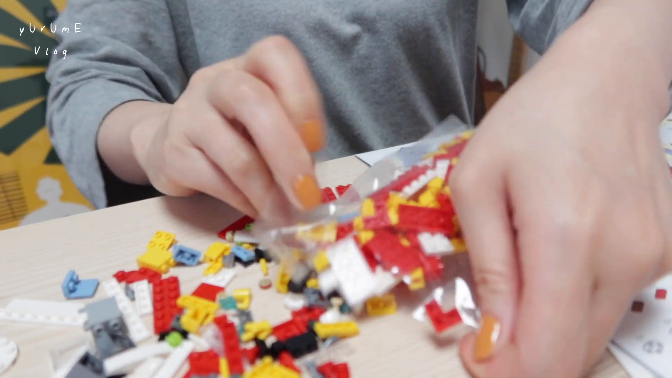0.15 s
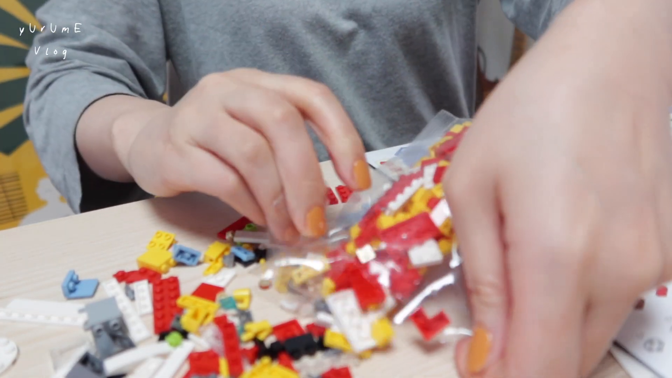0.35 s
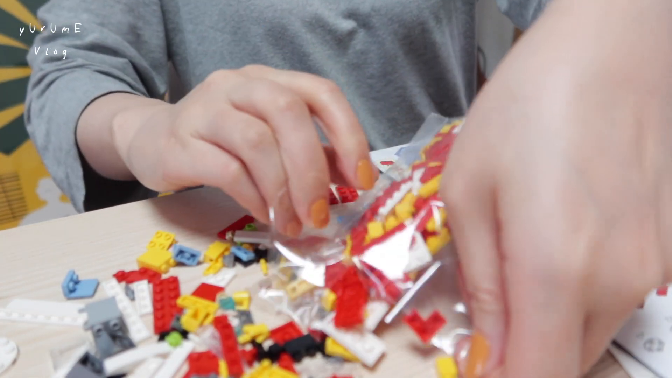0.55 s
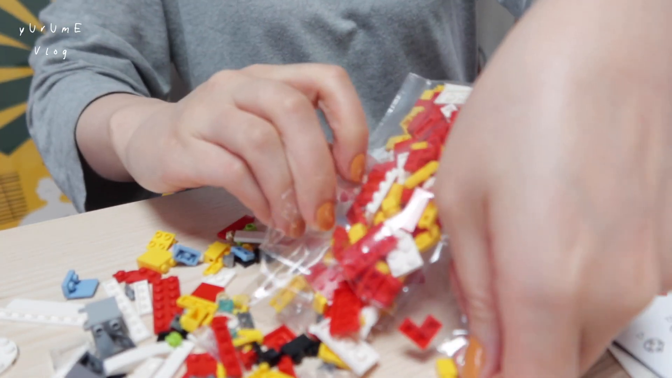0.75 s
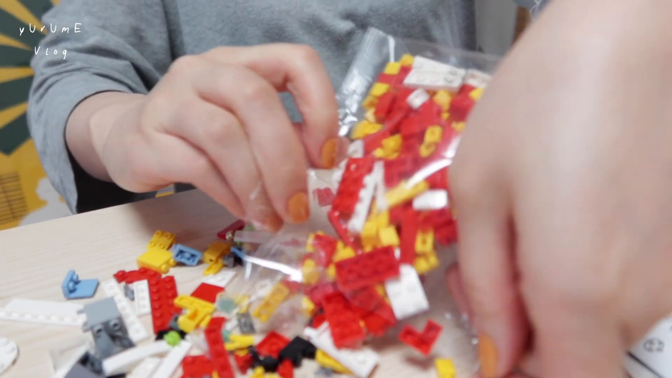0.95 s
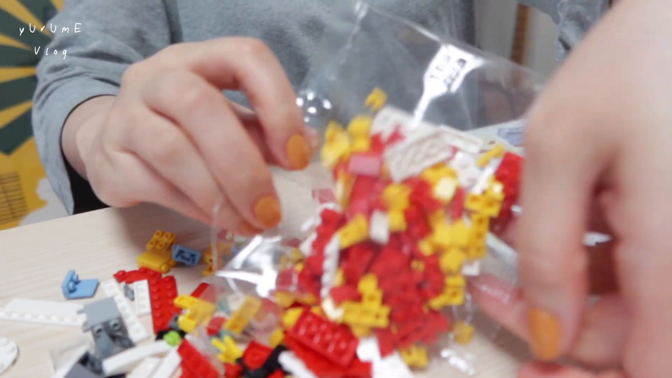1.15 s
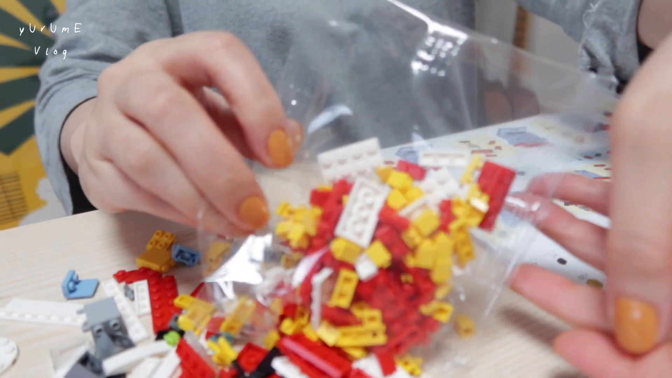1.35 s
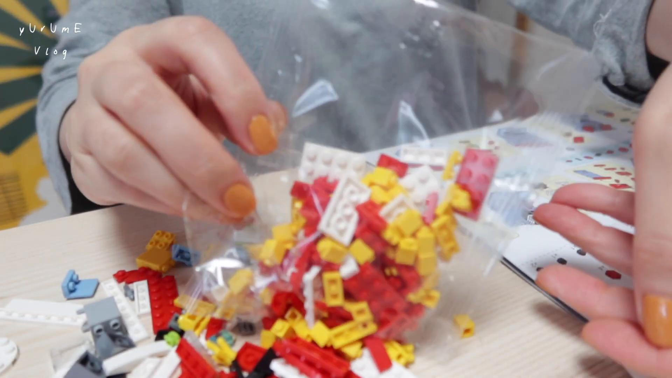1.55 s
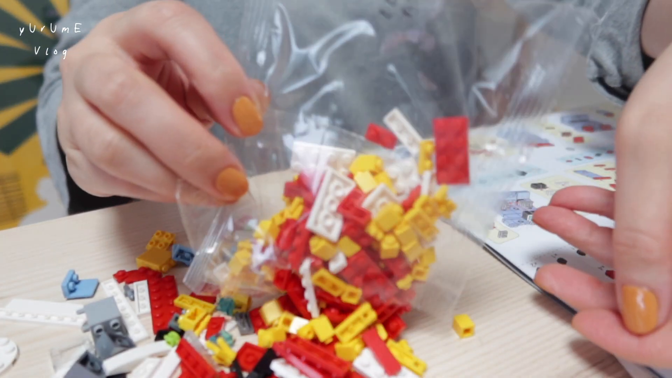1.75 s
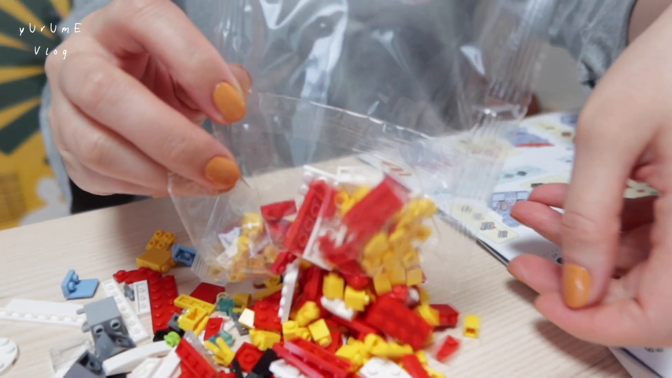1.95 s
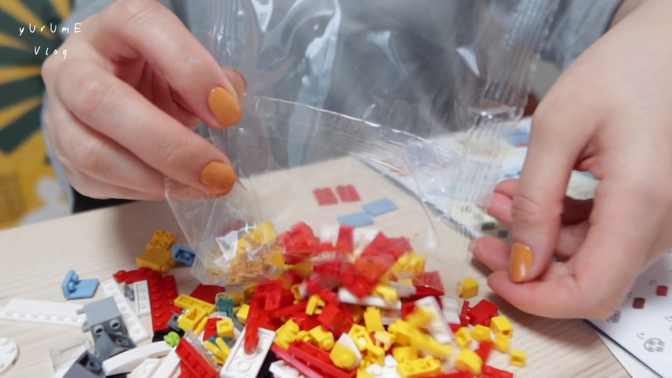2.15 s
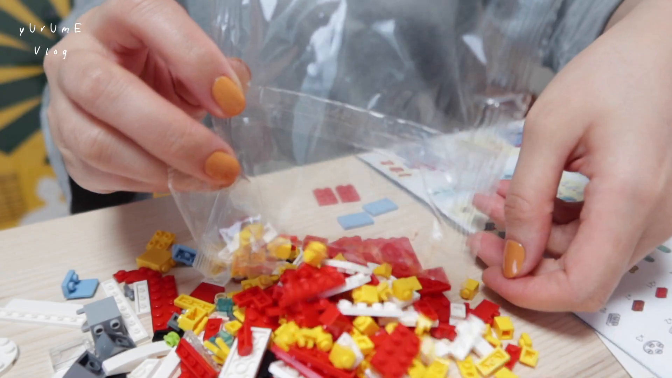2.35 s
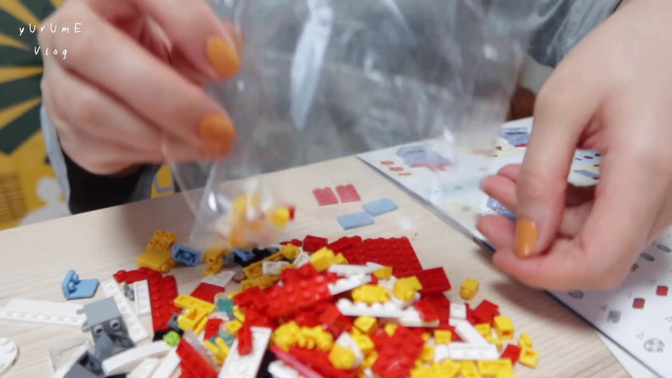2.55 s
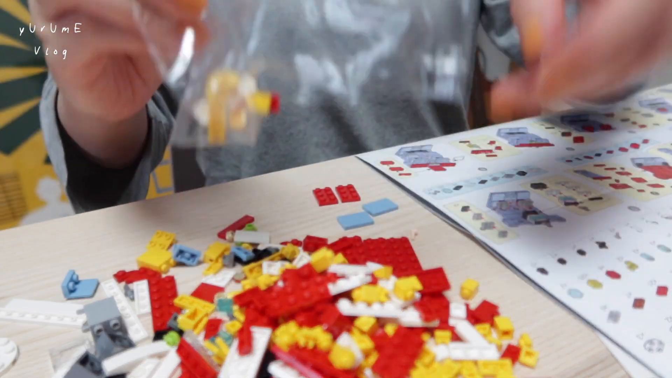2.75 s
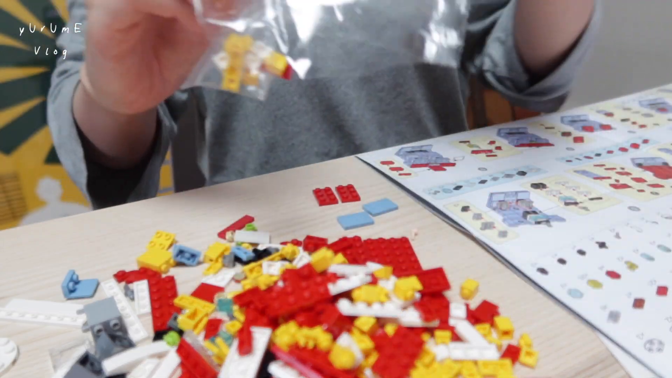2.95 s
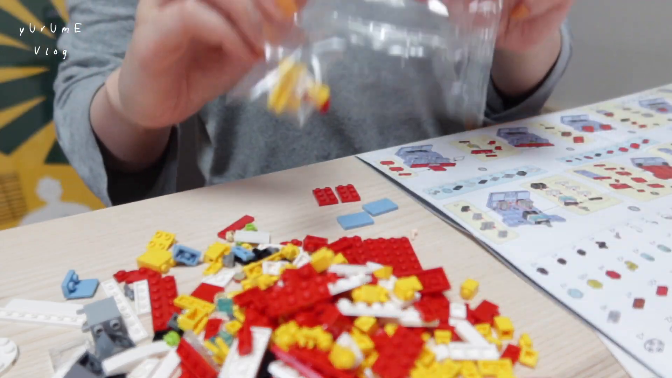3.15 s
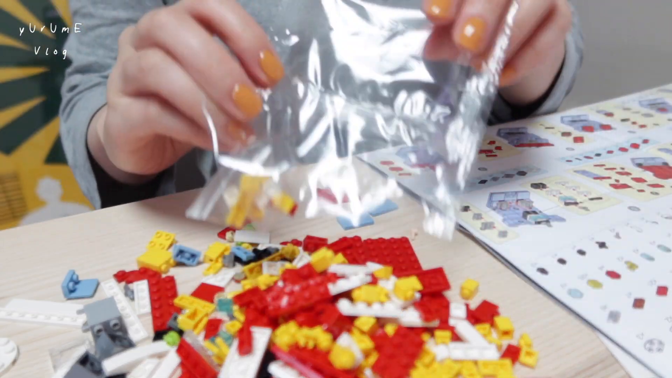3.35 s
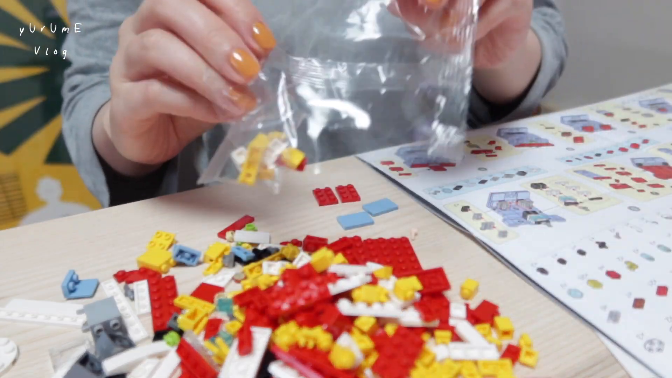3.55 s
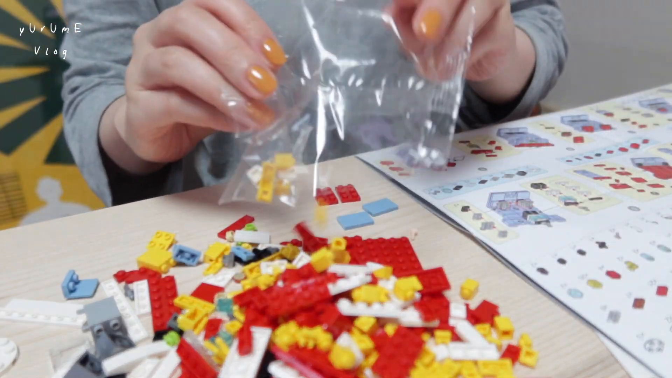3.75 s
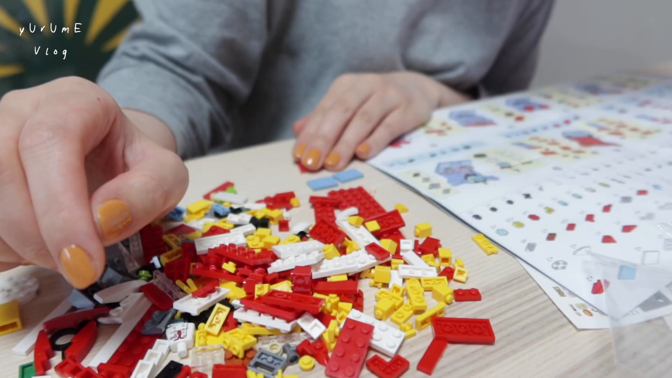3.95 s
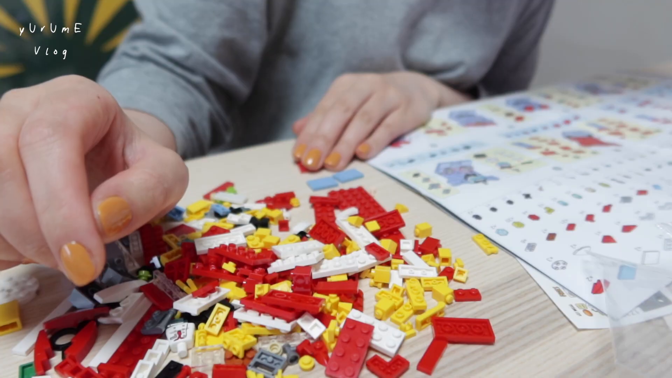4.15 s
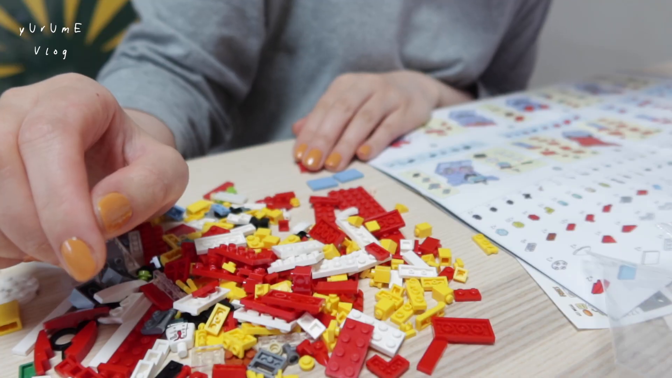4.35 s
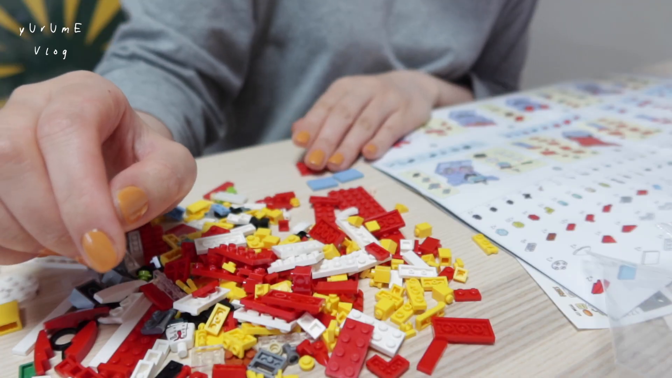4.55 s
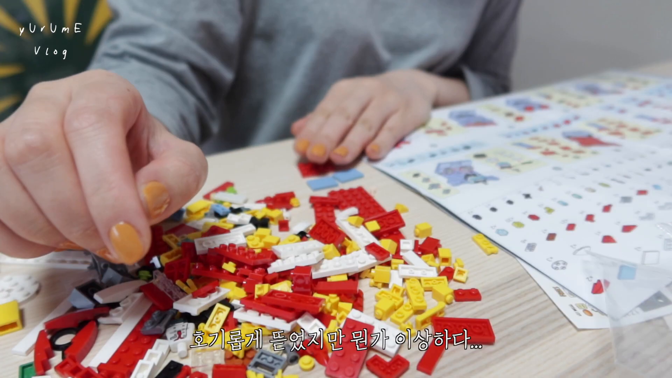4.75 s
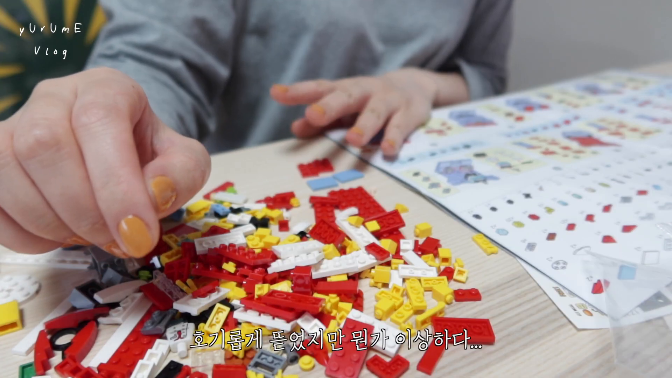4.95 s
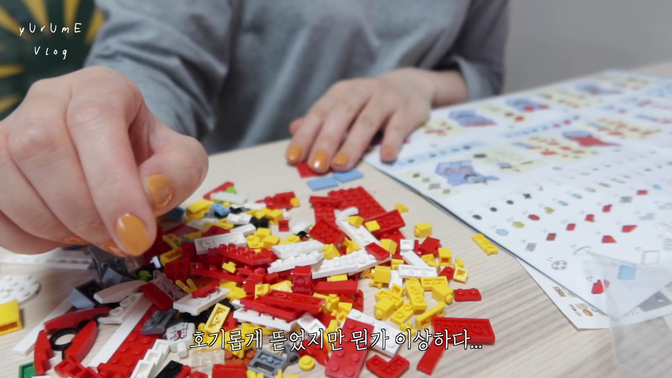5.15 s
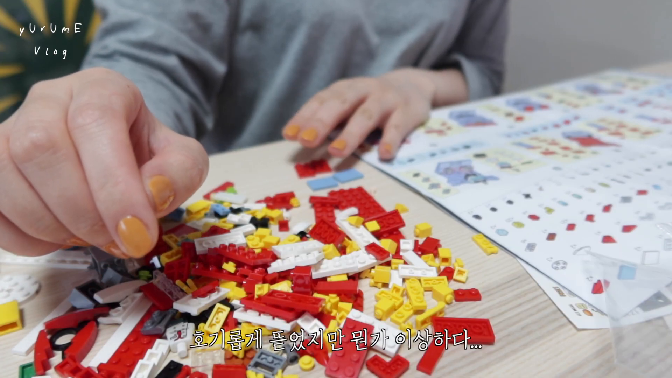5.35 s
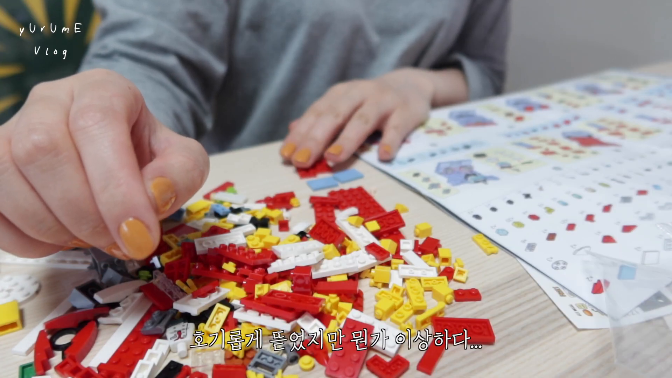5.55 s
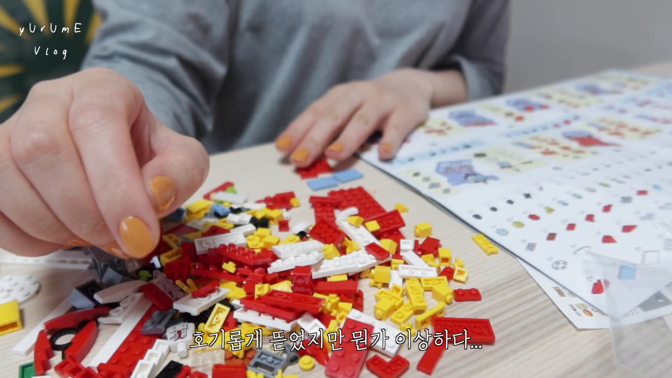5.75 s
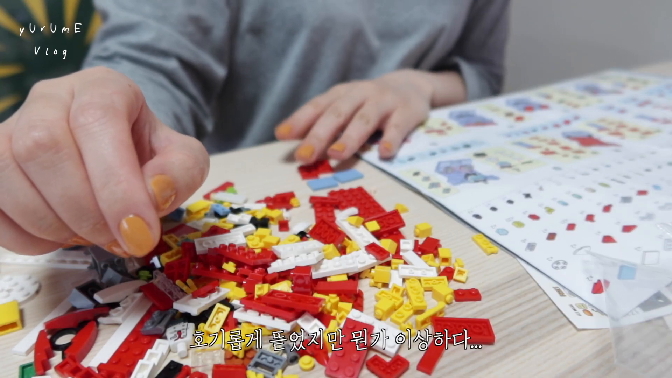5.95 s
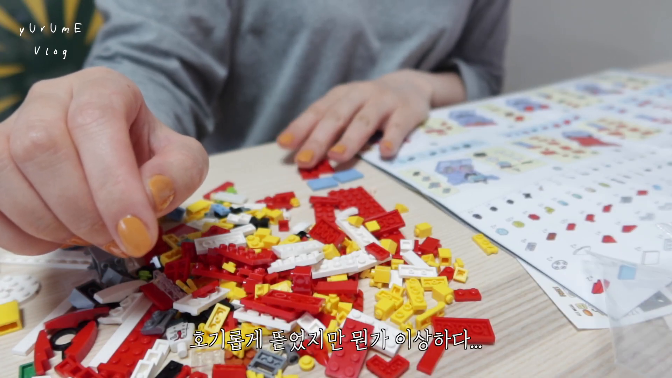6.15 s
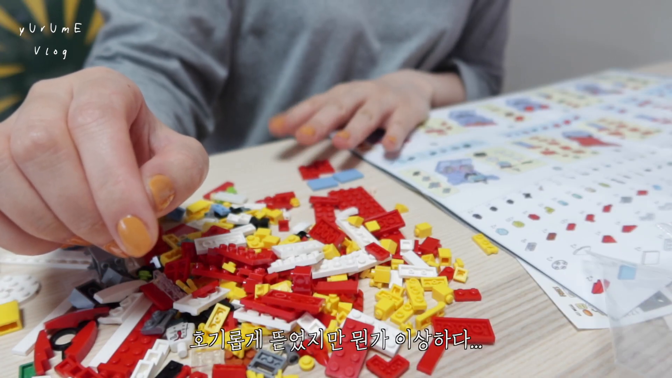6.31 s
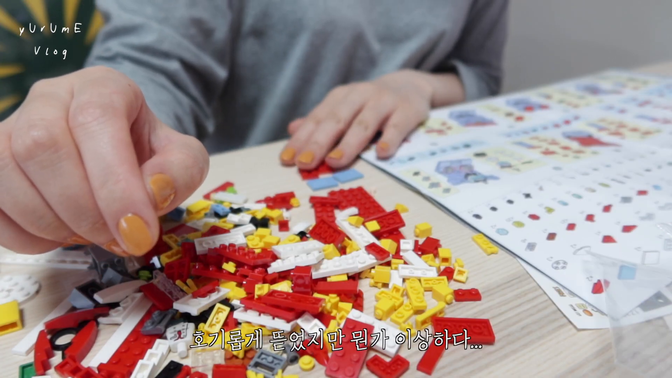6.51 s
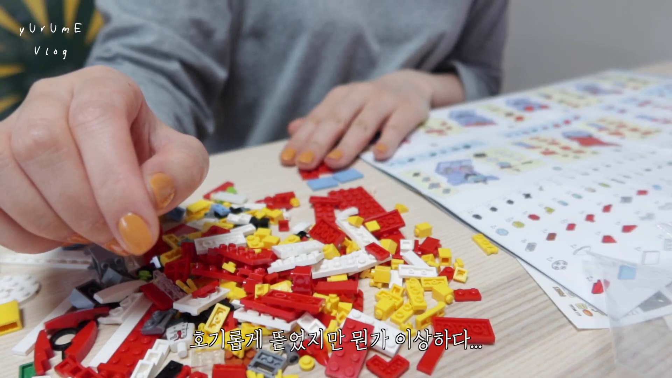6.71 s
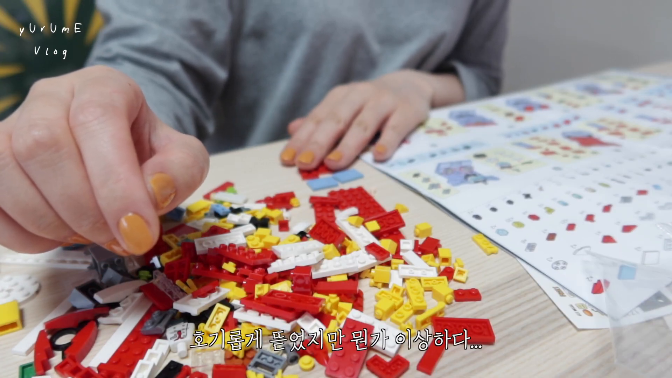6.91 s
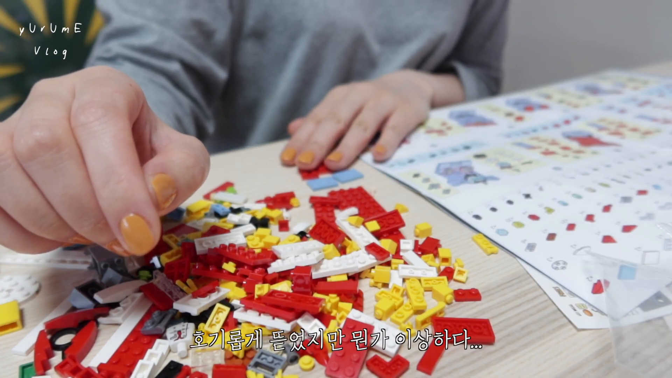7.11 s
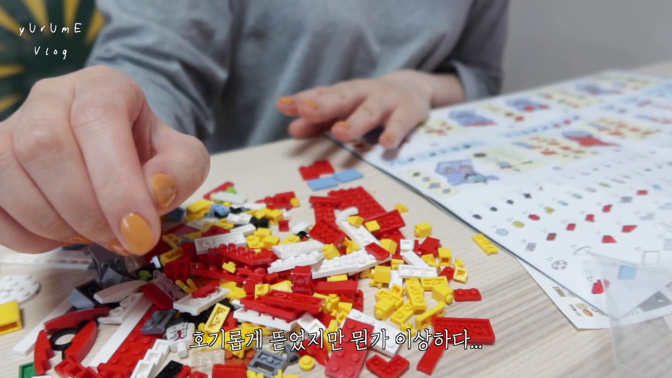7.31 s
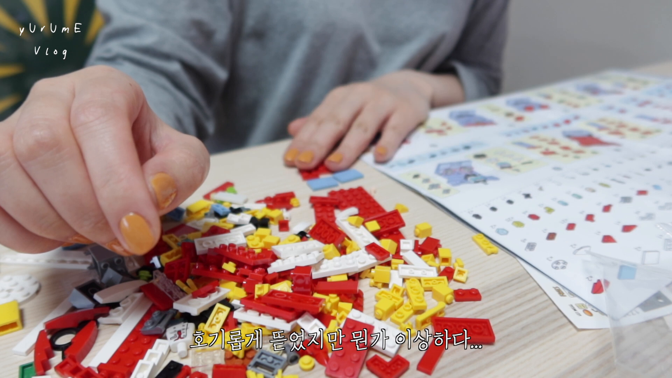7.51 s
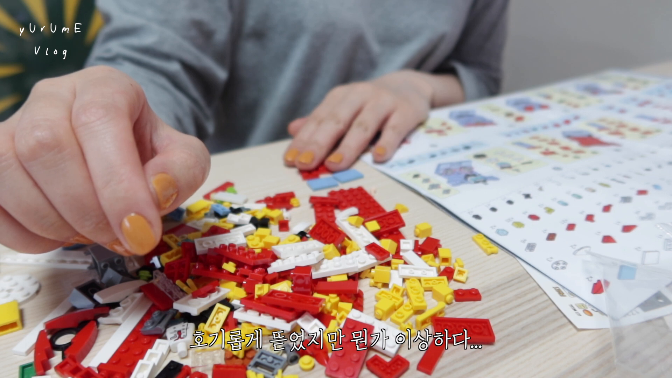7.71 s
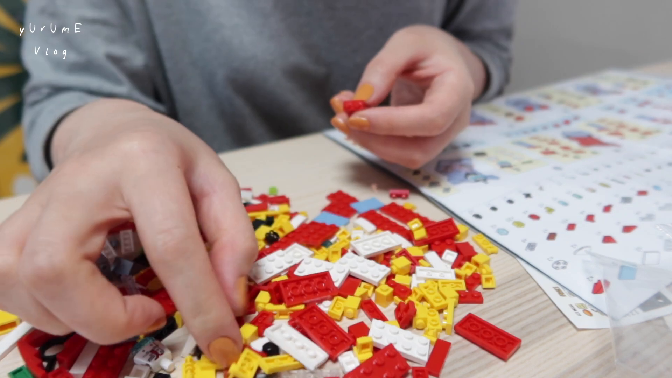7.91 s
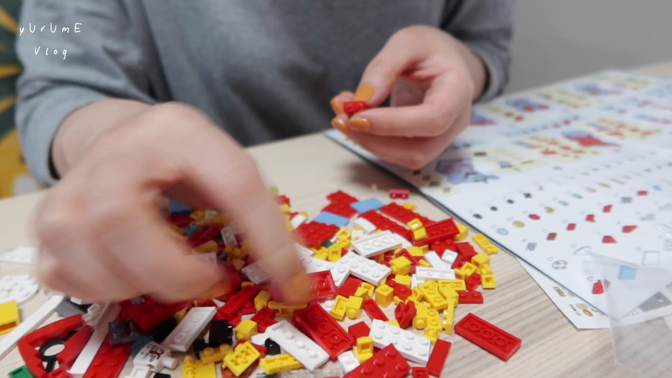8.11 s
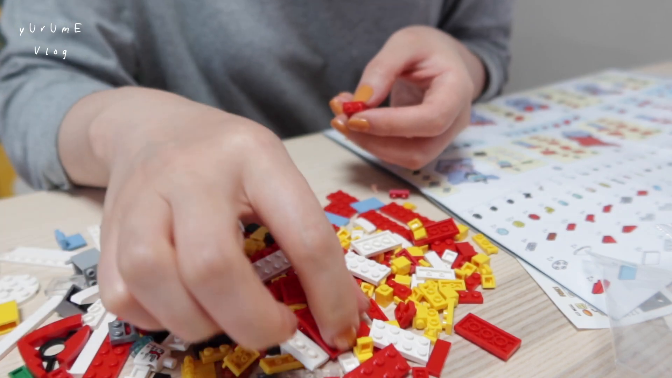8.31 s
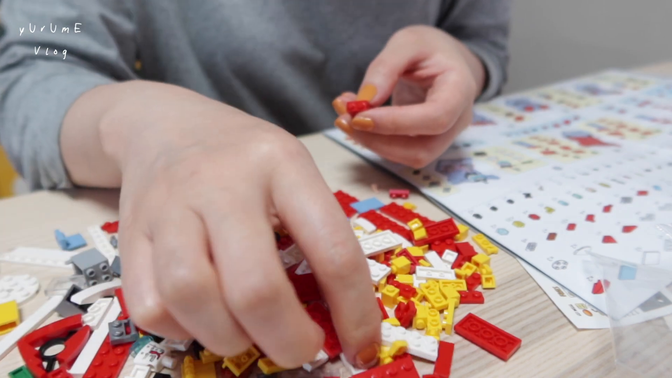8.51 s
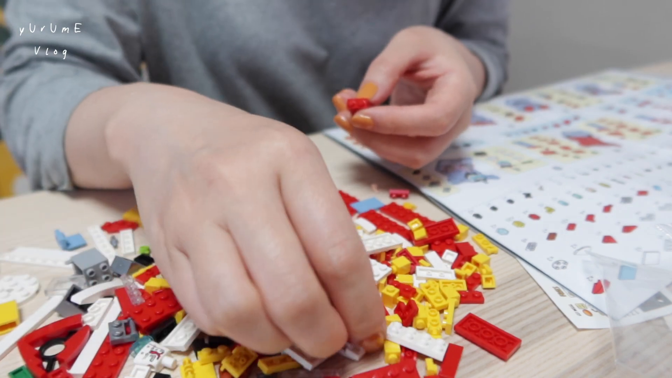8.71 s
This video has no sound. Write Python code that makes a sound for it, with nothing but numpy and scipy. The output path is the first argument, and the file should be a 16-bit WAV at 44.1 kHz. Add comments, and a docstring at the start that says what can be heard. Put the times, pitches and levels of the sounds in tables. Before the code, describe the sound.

Crinkling plastic bag and a clattering pour of small hard bricks, sharp film snaps, abrupt near-quiet with faint taps, then soft brick rummaging.

```python
"""In a small, quiet room small plastic bricks slide out of a crackling film bag onto a wooden table. The
emptied bag snaps, and at 3.987 s the room's tail stops short; then fingers tap, brush and shift a few bricks. A
faint whistle passes, a thin tile rings, and last the fingers rake through the heap. Contacts are damped cycles,
noise bursts and struck modes, sent through a decaying room. A band of noise near 1.1 kHz hums under everything,
over the microphone's hiss."""
import sys
import numpy as np
from scipy import signal
from scipy.fft import rfft, irfft, next_fast_len
from scipy.io import wavfile
from scipy.ndimage import map_coordinates

SR = 44100
rng = np.random.default_rng(int(sys.argv[2]) if len(sys.argv) > 2 else 0)


def store_pcm(level_fs):
    """Save levels as 16-bit WAV."""
    pcm = np.round(np.clip(level_fs, -1, 1) * 32767).astype(np.int16)
    wavfile.write(sys.argv[1], SR, np.atleast_2d(pcm).T)


N = 391166

# single snaps of film and bricks, before the trims of each layer:
# [t/s, level/dB, f/Hz, crack re snap/dB, knock re snap/dB, t60/s]
SNAPS = [(0.0387, -16, 4170, -28, -15.5, 0.0077), (0.0636, -18.5, 3580, -24, -25, 0.007),
         (0.0738, -18.5, 5700, -17, -17, 0.007), (0.121, -15.5, 2950, -24, -24, 0.0066),
         (0.1312, -22, 2420, -18, -16, 0.0076), (0.1955, -17, 1630, -9, -7.5, 0.0063),
         (0.221, -15, 5740, -12, -17, 0.0063), (0.2396, -16.5, 4480, -4, -24, 0.0066),
         (0.2542, -20, 3360, 5.5, -26, 0.0066), (0.352, -26, 3380, -7, -22, 0.007),
         (0.3697, -12.5, 3950, -13, -27, 0.014), (0.416, -26, 5290, -1, -18, 0.0063),
         (0.4476, -32, 3180, 7, -19, 0.0082), (0.4738, -11.5, 4100, -21, -12.5, 0.0072),
         (0.518, -21, 3210, -9, -20, 0.0062), (0.5954, -32, 3060, -4, -13, 0.007),
         (0.6261, -12, 1900, -15, -22.5, 0.0074), (0.6726, -16.5, 2590, -20, -28, 0.0072),
         (0.6962, -11.5, 4450, -20, -36, 0.0063), (0.7056, -19, 3200, -20, -16.5, 0.0082),
         (0.7214, -9.5, 3600, -19, -29, 0.0074), (0.7224, -7.5, 1530, -33, -42, 0.0063),
         (0.749, -19, 1910, -29, -27, 0.0064), (0.8096, -7.5, 2380, -26.5, -29, 0.01),
         (0.8157, -19, 1500, -12.5, -15.5, 0.007), (0.8255, -22, 1600, -14, -15, 0.0077),
         (0.83, -2.5, 3460, -15, -32, 0.0084), (0.9296, -31, 4690, -14, 3, 0.0064),
         (0.985, -13.5, 1400, -20.5, -6.5, 0.0043), (1.0003, -13, 1500, -12.5, -21, 0.007),
         (1.015, -10.5, 2660, -27, -23.5, 0.007), (1.0424, -13, 3670, -20, -14, 0.0079),
         (1.0795, -14, 4800, -16, -22, 0.007), (1.0967, -8, 1760, -8, -9, 0.0064),
         (1.179, 2, 3260, -24, -36, 0.016), (1.3204, -10, 2710, -32, -26, 0.0076),
         (1.355, -25, 1510, -11.5, -23, 0.007), (1.424, -32, 2350, -3, -18, 0.007),
         (1.452, -27, 1900, -8, -11, 0.007), (1.5357, -12, 1600, -23, -19, 0.0065),
         (1.5775, -16, 2020, -30, -21, 0.0085), (1.6232, -19, 3280, -12, -16, 0.0077),
         (1.693, -21.5, 4720, -11, -13, 0.0075), (1.7254, -16.5, 3240, -3, -15.5, 0.0086),
         (1.834, -11.5, 2190, -19, -20, 0.0064), (1.865, -7.5, 2860, -21, -17.5, 0.0046),
         (1.9224, -7, 5120, -8, -24, 0.0067), (1.9812, -8, 5240, -8, -28, 0.0058),
         (2.07, -8, 4870, -19, -14.5, 0.0061), (2.1144, -16, 4960, 1, -29, 0.007),
         (2.1234, -7, 4920, -11, -32, 0.0076), (2.1564, -22, 4680, 5.5, -11, 0.0076),
         (2.2, -10.5, 4720, -4, -32, 0.0093), (2.288, -4.5, 4700, -13, -24, 0.007),
         (2.4207, -9.5, 4600, -18, -30, 0.0061), (2.4853, -22, 4040, -7, -16, 0.007),
         (2.5134, -27, 3210, -17, -35, 0.0063), (2.8363, -9, 4380, -13.5, -59, 0.011),
         (2.9404, -24, 3600, -30, -24, 0.0075), (2.9601, -24, 2720, -23, -20, 0.0091),
         (2.9773, -25, 2270, -22, -28, 0.0075), (3.0952, -33, 4570, -16, -16, 0.007),
         (3.1581, -14, 2980, -35, -13, 0.0086), (3.1691, -17, 2900, -41, -6, 0.01),
         (3.2213, -15.5, 3080, -32, -30, 0.0094), (3.258, -16.5, 3600, -17, -11.5, 0.0083),
         (3.279, -30, 1500, -30, -5, 0.007), (3.2945, -15, 3200, -37, -12, 0.0071),
         (3.3903, -31.5, 1580, -29, 6, 0.0058), (3.4163, -27, 1760, -26, -10, 0.0064),
         (3.4615, -0.5, 3600, -11.5, -30, 0.0069), (3.471, -20, 2320, -18, -22, 0.007),
         (3.5214, -23, 3800, -31, -6, 0.0047), (3.5368, -7, 3030, -28, -13.5, 0.0066),
         (3.6456, -40, 3290, -21, -11, 0.007), (3.6583, -28, 1560, -19, -5, 0.0053),
         (3.6698, -6, 3070, -16.5, -18.5, 0.011), (3.6843, -25.5, 1570, -17, 1, 0.0057),
         (3.7053, -21, 1540, -12, -19, 0.007), (3.7307, -23.5, 1990, -19, -9, 0.007),
         (3.7588, -19.5, 3570, -21, -14, 0.007), (3.7912, -8, 5810, -11, -28, 0.0081),
         (3.8024, -4.5, 5330, -12, -34, 0.011), (3.805, -14, 5700, -10, -30, 0.012),
         (3.8246, -20, 3630, -23, -24, 0.007), (3.8424, -13, 3740, -10, -25, 0.0076),
         (3.8478, -3, 4100, -7, -21, 0.0086), (3.8589, -14, 4940, -8, -14, 0.012),
         (3.866, -7.5, 3240, -19, -17, 0.012), (3.8697, -5.5, 2710, -15, -19, 0.011),
         (3.8896, 1, 3370, -12, -20, 0.005), (3.8913, -5.5, 3640, -23, -18, 0.008),
         (3.8978, -15, 2200, -20, -22, 0.007), (3.9003, -5, 4700, -19, -35, 0.011),
         (3.9105, -8, 3070, -27, -28, 0.0064), (3.929, -9, 3950, -14, -21, 0.0053),
         (3.9467, -2.5, 3280, -13, -14.5, 0.0073), (5.3233, -21, 3260, -16, -33, 0.0081),
         (6.4238, -34.5, 2400, -18, -12, 0.0072), (7.553, -30.5, 2330, -25, -27, 0.016),
         (7.824, -18.5, 4900, -2, -23, 0.0064), (7.8512, -14, 4960, -1, -21, 0.0075),
         (7.9015, -13, 4250, -13, -39, 0.007), (7.934, -19.5, 4700, -1, -25, 0.0082),
         (7.9615, -22, 1660, -10, -23, 0.007), (7.9856, -19, 4800, -17, -29, 0.009),
         (8.03, -21.5, 4860, -13, -26, 0.0084), (8.1058, -24, 4800, -5.5, -24, 0.0074),
         (8.1424, -27.5, 6300, -21, -27, 0.0063), (8.1514, -26, 6160, -17, -25, 0.0078),
         (8.424, -23, 4700, -9, -11, 0.0061), (8.4718, -19, 4800, -6, -17, 0.0097),
         (8.5051, -23, 4460, -6, -13, 0.0059), (8.5604, -37, 4380, -14, -22, 0.007),
         (8.5805, -31, 4320, -20, -17, 0.0088), (8.6218, -30, 3840, -7, -27, 0.0076),
         (8.6418, -37, 4970, -14, -17, 0.007), (8.667, -30, 4320, -10, -21, 0.0077),
         (8.6812, -24, 4750, -4, -18, 0.007), (8.7156, -28, 4790, -12, -25, 0.0076),
         (8.7425, -28, 5000, -18, -22, 0.007), (8.77, -30, 4300, 3, -22, 0.007),
         (8.792, -24, 6100, -13, -18, 0.0074), (8.807, -26, 1610, -5, -16, 0.0064),
         (8.847, -20.5, 2720, -11, -24, 0.0079)]
# shell modes of a plastic brick: [f/Hz, width/Hz, relative level/dB]
BRICK_MODES = [(565, 37, -15.5), (1623, 60, -11), (3280, 600, -16.5), (4775, 86, -4), (5600, 890, -16),
               (10450, 136, -4), (11300, 98, -10), (12200, 3100, -19.5)]
SIZE_SCATTER = 0.019  # largest relative shift of the modes from brick to brick
SNAP_LAG_S, SNAP_RISE_S = 0.000985, 0.0005  # short silent delay before each piece sounds; then its rise


def amp(db):
    """Decibels to gain."""
    return 10 ** (np.asarray(db) / 20)


def unit(x):
    """Scaled to rms 1."""
    return x / np.sqrt(np.mean(x ** 2) + 1e-20)


def along(points, hz):
    """Values between (Hz, value) points on a log frequency axis."""
    f, v = np.transpose(points)
    return np.interp(np.log(hz + 1), np.log(f + 1), v)


def filtered(x, response):
    """x times a complex response of frequency."""
    m = next_fast_len(N + SR // 2)
    return irfft(rfft(x, m) * response(np.fft.rfftfreq(m, 1 / SR)), m)[..., :N]


def causal(spectrum):
    """Minimum-phase response for a (Hz, dB) spectrum, so that nothing sounds before a blow."""
    def response(hz):
        cepstrum = irfft(np.log(amp(along(spectrum, hz)) + 1e-6))
        half = len(cepstrum) // 2
        cepstrum[1:half] *= 2
        cepstrum[half + 1:] = 0
        return np.exp(rfft(cepstrum))
    return response


def high_pass(hz, corner_hz):
    """First-order response that loses the bass below its corner."""
    return 1j * hz / (corner_hz + 1j * hz)


def contacts(per_second, spread_db):
    """Random impulses of either sign, many small and a few large."""
    hit = rng.random(N) < per_second / SR
    size_db = spread_db * np.minimum(rng.exponential(size=N), 4)
    return hit * amp(size_db) * rng.standard_normal(N)


def grains(spectrum, per_second, cycles, spread_db):
    """Random contacts of scattered size, each damped cycles at its own pitch, 60 dB down after `cycles`."""
    rows = rng.random((int(per_second * N / SR), 4))
    low, high = spectrum[0][0], spectrum[-1][0]
    hz = low * (high / low) ** rows[:, 1:2]
    size_db = spread_db * np.minimum(-np.log(rows[:, 2:3]), 4)
    size = amp(along(spectrum, hz) + size_db) * np.sqrt(hz)
    turns = np.arange(int(cycles * SR / low * 2 // 3)) / SR * hz  # cycles since contact
    wave = size * amp(-60 * turns / cycles) * np.sin(2 * np.pi * turns) * np.minimum(turns, 1)
    where = (rows[:, :1] * N).astype(int) + np.arange(turns.shape[1])
    return unit(np.bincount(where.ravel(), wave.ravel())[:N])


def stretches(tables):
    """One gain per level column, silent between the movements, clumpy within them."""
    uneven_db, uneven_per_s = 2.5, 30  # bricks come in clumps
    t, gains = np.arange(N) / SR, 0
    for rows in tables:
        s, *columns = np.transpose(rows)
        gains = gains + amp([np.interp(t, s, c, left=-120, right=-120) for c in columns])
    knots = rng.standard_normal((len(gains), int(N / SR * 60)))
    wander_db = [uneven_db * map_coordinates(k, [t * uneven_per_s]) for k in knots]
    return gains * amp(wander_db)


def background():
    """Steady noise shaped in frequency: the hum near 1.1 kHz and the microphone's hiss."""
    # the quiet room and microphone: [f/Hz, relative density/dB]
    quiet_spectrum = [(15, -41), (25, -8), (85, -6.5), (124, -8), (208, -7.5), (378, -13), (470, -9),
                      (706, -15.5), (1150, -1), (1430, -16), (1600, -19.5), (2600, -19.5), (2820, -21),
                      (14800, -25), (16500, -24.5)]
    noise = filtered(rng.standard_normal(N), lambda hz: amp(along(quiet_spectrum, hz)))
    return amp(-53) * unit(noise)  # rms in dB


def room(x, pieces=30):
    """Each frequency of the room's answer dies at its own speed; the hands move, so the tail changes."""
    # decay of the small room: [f/Hz, t60/s]
    room_decay = [(200, 0.29), (1000, 0.38), (4000, 0.2), (12000, 0.24)]
    cut_s, build_up_s = 3.987, 0.0065
    out, cut = np.zeros(N + SR), round(cut_s * SR)
    edges = np.unique(np.append(np.linspace(0, N, pieces).astype(int), cut))
    for a, b in zip(edges, edges[1:]):
        if a == cut:
            out[cut:] = 0  # the tail breaks off here
        hz, t, cells = signal.stft(rng.standard_normal(SR // 3), SR, nperseg=256)
        fall = amp(-60 * t / along(room_decay, hz)[:, None])
        tail = signal.istft(cells * fall * (1 - np.exp(-t / build_up_s)), SR, nperseg=256)[1]
        wet = signal.fftconvolve(x[a:b], tail / np.linalg.norm(tail))
        out[a:a + len(wet)] += wet
    return out[:N]


def whistle():
    """A faint whistle: resonant narrow noise that fades in and out."""
    # the whistle's band: [f/Hz, width/Hz, level/dB]
    hz, width_hz, db = (3300, 70, -73)
    # when it is heard: [from t/s, to t/s]
    start, end = (4.5, 5.22)
    t = np.arange(N) / SR
    band = signal.lfilter(*signal.iirpeak(hz, hz / width_hz, fs=SR), rng.standard_normal(N))
    fade = np.clip(np.minimum(t - start, end - t) / 0.05, 0, 1)
    return amp(db) * unit(band) * fade


def board():
    """One soft blow on the table top: low modes that swell and decay, their levels varying by blow."""
    # modes of the wooden table top: [f/Hz, relative level/dB, t60/s]
    board_modes = [(55.1, -9, 0.54), (80.7, 1.5, 0.2), (108.3, 8.5, 0.095), (144.9, 2, 0.13),
                   (208, 7, 0.067)]
    t = np.arange(SR // 2) / SR
    ring = 0
    for hz, level, t60 in board_modes:
        fall = amp(level + rng.normal(0, 0.58) - 60 * t / t60)
        ring = ring + fall * np.sin(2 * np.pi * hz * t)
    return ring * (1 - np.exp(-t / 0.023))


def thumps():
    """Soft fingertips set the table top ringing low."""
    # fingers landing on the table top: [t/s, level/dB before the trim]
    landings = [(4.521, -56), (6.164, -40.5), (6.423, -31.5), (7.555, -28), (7.828, -58)]
    out = np.zeros(N + SR)
    for s, db in landings:
        out[round(s * SR):][:SR // 2] += amp(db - 3.5) * board()
    return out[:N]


def shudder(blows):
    """Tumbling bricks and hard snaps set the table top humming low."""
    jolt_db = -11.5  # how hard a snap's knock shakes the table top
    jolts = np.zeros(N)
    for s, db, _, _, knock_db, _ in SNAPS:
        jolts[round(s * SR)] = amp(db + knock_db + jolt_db)
    hum = signal.fftconvolve(blows + jolts, board())[:N]
    return filtered(hum, lambda hz: high_pass(hz, 150) ** 3)


def touches():
    """Each brush is a soft puff of noise around its centre."""
    # fingertips brushing bricks and paper: [t/s, level/dB, centre f/Hz]
    brushes = [(4.456, -44, 2580), (4.51, -50, 3370), (4.52, -54, 650), (4.595, -52, 2200),
               (4.69, -53, 2400), (5.125, -50, 2500), (5.14, -47.5, 2350), (5.215, -52, 2600),
               (5.534, -51, 2600), (5.604, -51, 2300), (5.989, -48, 1600), (6.168, -47.5, 2540),
               (6.424, -49.5, 2420), (7.251, -51, 2300), (7.556, -44, 3000)]
    rise_s, t60_s, width_hz = 0.0064, 0.07, 1040
    out, t = np.zeros(N + SR), np.arange(SR // 10) / SR
    for s, db, hz in brushes:
        band = signal.butter(2, [hz - width_hz / 2, hz + width_hz / 2], "band", fs=SR)
        puff = unit(signal.lfilter(*band, rng.standard_normal(len(t))))
        shape = amp(db - 60 * t / t60_s) * np.minimum(t / rise_s, 1)
        out[round(s * SR):][:len(t)] += shape * puff
    return out[:N]


def tile():
    """One thin tile, flicked by a nail, rings on in decaying sines."""
    # modes of the tile: [f/Hz, level/dB, t60/s]
    tile_modes = [(7900, -30, 0.022), (12500, -41, 0.018)]
    t = np.maximum(np.arange(N) / SR - 5.3241, 0)  # seconds since the flick
    return sum(amp(db - 60 * t / t60) * np.sin(2 * np.pi * hz * t) for hz, db, t60 in tile_modes)


def clinks():
    """Where a snap is two bricks meeting, the shell rings on, each brick a little off the common modes."""
    # when the snaps are bricks meeting: [from t/s, to t/s]
    brick_spans = [(0.93, 2.6), (7.8, 8.87)]
    clink_db = -9  # shell ring relative to its snap, before the mode levels
    out, t = np.zeros(N + SR), np.arange(SR // 20) / SR
    hz, width_hz, level = np.transpose(BRICK_MODES)[:, :, None]
    for s, db, *_ in SNAPS:
        if not any(a < s < b for a, b in brick_spans):
            continue
        off, uneven = rng.uniform(-1, 1, hz.shape), rng.standard_normal(hz.shape)
        fall = amp(db + clink_db + level + 3 * uneven) * np.exp(-np.pi * width_hz * t)
        ring = fall * np.sin(2 * np.pi * hz * (1 + SIZE_SCATTER * off) * t)
        at = round((s + SNAP_LAG_S + SNAP_RISE_S) * SR)
        out[at:][:len(t)] += ring.sum(0)
    return out[:N]


def snaps():
    """Each snap: a few cycles at its pitch that fray into noise, a bright crack and a short knock."""
    fray, crackle = 0.3, 0.6  # noise that follows the first tick of a snap and of its crack
    crack_share, knock_t60_s = 0.64, 0.014  # life of a crack over that of its snap; life of a knock
    out, cracks, t = np.zeros(N + SR), np.zeros(N + SR), np.arange(SR // 30) / SR
    rise = np.minimum(t / SNAP_RISE_S, 1) ** 2
    let_go = np.arange(len(t)) == round(SNAP_RISE_S * SR)
    for s, db, hz, crack_db, knock_db, t60 in SNAPS:
        noise, scatter = rng.standard_normal((2, len(t))), rng.standard_normal(5)
        life_s = np.clip(t60, 0.003, 0.03)
        fall = amp(db - 1.5 - 60 * t / life_s) * rise

        turns = hz * t[:130]  # cycles since the start
        upper, top = 1.52 * amp(1.1 * scatter[3]), 2.46 * amp(0.71 * scatter[4])  # differ by piece
        shape = np.sin(2 * np.pi * turns)
        shape += 0.43 * np.sin(2 * np.pi * upper * turns)
        shape += 0.186 * np.sin(2 * np.pi * top * turns)
        mode = 4 * turns * amp(-60 * turns / 2.96) * shape  # the piece's broad modes
        push = fray * noise[0] * (t > SNAP_RISE_S) + 2.46 * let_go
        body = np.convolve(push * fall, mode)[:len(t)] * np.sqrt(hz / 2500)

        knock_fall = amp(db + knock_db - 1 - 60 * t / knock_t60_s)
        knock = 0
        for low_hz, v in zip((300, 560, 1000), scatter):
            knock = knock + knock_fall * np.sin(2 * np.pi * low_hz * amp(2.28 * v) * t)

        crack_fall = amp(db + crack_db + 9.5 - 60 * t / (crack_share * life_s))
        at = round((s + SNAP_LAG_S) * SR)
        out[at:][:len(t)] += body + knock * rise
        cracks[at:][:len(t)] += crack_fall * (crackle * rise * noise[1] + 2.2 * let_go)
    bright = causal([(1200, -32.0), (3000, -15.5), (6500, 3.5), (10400, 5.0), (13000, -0.5), (16000, -10.0)])
    return out[:N] + filtered(cracks[:N], bright)


def ringing(count):
    """Bricks of several sizes, struck independently; each has its shell modes a little off the common ones."""
    out = 0
    sizes = np.array([rng.permutation(np.linspace(-1, 1, count)) for _ in BRICK_MODES]).T
    for off in 1 + SIZE_SCATTER * sizes:
        hits = contacts(170, spread_db=2.2)
        for k, (hz, width_hz, db) in enumerate(BRICK_MODES):
            mode = signal.iirpeak(hz * off[k], hz / width_hz, fs=SR)
            gain = (-1) ** k * amp(db + rng.normal(0, 3.0))
            out = out + gain * signal.lfilter(*mode, hits)
    return unit(out)


def heap():
    """Bricks tumbling: dull knocks on wood, dry ticks and ringing shells; the film rustles more softly."""
    # the bag tips, bricks pour out, fingers rake the heap; one table a jerk, surge or stroke:
    # [t/s, dry rattle level/dB, knocks on the table level/dB, brick ringing level/dB], before the trims
    jerks = [
        [(0.0, -39, -40, -58), (0.032, -44, -47, -57), (0.04, -33, -40, -52), (0.056, -49, -58, -65),
         (0.062, -37, -48, -50), (0.19, -49, -52, -58)],
        [(0.2, -33, -38, -39), (0.208, -40.5, -44, -52), (0.244, -29, -33, -32.5), (0.344, -41, -55, -46.5),
         (0.354, -36, -39, -36), (0.365, -39, -42, -52)],
        [(0.378, -26, -49, -40), (0.4, -42, -47, -48), (0.454, -43, -48, -38), (0.47, -40.5, -41, -63),
         (0.524, -34, -39.5, -40), (0.62, -47.5, -48, -59)],
        [(0.632, -37, -39, -58), (0.646, -48, -49, -67), (0.702, -35, -39, -52), (0.718, -36, -37, -64),
         (0.792, -53, -58, -70), (0.805, -45, -46, -66)],
        [(0.838, -36, -37, -52), (0.846, -49, -48, -61), (0.862, -37, -35.5, -58), (0.916, -44, -46, -49),
         (0.92, -45, -48, -64), (0.93, -40, -29, -61)],
    ]
    pour = [
        [(0.93, -35, -40, -64), (0.942, -39, -44.5, -50.5), (0.96, -38, -36.5, -53.5),
         (0.994, -31.5, -31, -37.5), (1.02, -22.5, -26, -43.5), (1.034, -27, -32, -40),
         (1.148, -22.5, -24.5, -24), (1.172, -20, -20.5, -24.5)],
        [(1.192, -26, -27, -30), (1.21, -22, -26.5, -35), (1.276, -30, -31, -37), (1.302, -28, -27, -47),
         (1.362, -30.5, -40.5, -42), (1.38, -42, -38, -62), (1.432, -44, -41.5, -43), (1.47, -36.5, -39, -59)],
        [(1.47, -36, -36, -54), (1.584, -39, -36, -59), (1.608, -45, -45, -68), (1.626, -35, -37, -42),
         (1.642, -40.5, -40.5, -54), (1.776, -31, -32.5, -36.5), (1.81, -36.5, -38.5, -39.5),
         (1.85, -29, -31.5, -36.5)],
        [(1.85, -24.5, -27.5, -47.5), (1.896, -31, -42, -36.5), (1.904, -25, -29.5, -28),
         (2.13, -23, -29.5, -23.5), (2.138, -27, -33.5, -25), (2.328, -35, -39, -28.5), (2.434, -40, -46, -37),
         (2.7, -69, -80, -83)],
    ]
    rakes = [
        [(7.822, -60, -60, -62), (7.824, -33, -37, -39), (7.854, -29, -43.5, -25.5), (7.886, -36.5, -51, -38),
         (7.994, -36, -46, -45), (8.128, -52, -55, -65), (8.158, -46, -47.5, -53), (8.17, -56, -64, -66),
         (8.25, -70, -77, -77)],
        [(8.41, -52, -60, -60), (8.43, -47, -48, -43), (8.608, -54, -56, -68.5), (8.628, -64, -59, -49),
         (8.658, -53, -58, -77), (8.68, -41.5, -50, -48), (8.84, -55.5, -57, -65), (8.846, -33.5, -45, -49),
         (8.87, -43.5, -44, -45)],
    ]
    # the empty bag and a few bricks moved about, one table a movement:
    # [t/s, soft rustle level/dB, knocks level/dB], before the trims
    rustles = [
        [(2.9, -49, -59), (3.03, -60, -62)],
        [(3.09, -49, -55), (3.208, -55, -52), (3.322, -55, -51), (3.38, -64, -68)],
        [(3.39, -47.5, -59), (3.502, -56.5, -57), (3.78, -45.5, -51)],
        [(3.79, -29.5, -47), (3.832, -37.5, -46), (3.952, -36.5, -60), (3.987, -42, -64)],
        [(4.45, -61, -57), (4.68, -69, -63.5), (5.098, -75, -62.5), (5.4, -61, -62)],
        [(8.25, -66, -72), (8.41, -62, -70)],
    ]
    # spectra of knocks on wood, of dry ticks and of soft film rustle: [f/Hz, relative level/dB]
    knock_spectrum = [(200, -10.5), (350, -8), (600, -5), (1200, -1.5), (2400, -6.5)]
    rattle_spectrum = [(1500, -4.5), (2200, -7), (3200, -1.5), (5500, -1.5), (7600, -21), (9500, 0.5),
                       (13000, -33.5), (16000, -23.5)]
    film_spectrum = [(1500, -21), (2400, -3.5), (3300, 2.5), (5000, 0), (7000, -9), (11000, -2)]

    rattle, knock, ring = stretches(jerks + pour + rakes)
    rustle, nudge = stretches(rustles)
    wood = grains(knock_spectrum, 750, cycles=4.5, spread_db=-0.5)
    ticks = grains(rattle_spectrum, 2500, cycles=7.1, spread_db=-0.4)
    film = grains(film_spectrum, 2505, cycles=6.0, spread_db=-1.0)
    bricks = amp(-1.0) * (knock + nudge) * wood
    bricks += amp(-3.0) * rattle * ticks
    bricks += amp(2.5) * ring * ringing(count=9)
    bricks += rustle * film
    # tumbling bricks shake the table top
    blows = amp(-19.5) * (knock + 0.6 * ring) * contacts(300, spread_db=0.5)
    return bricks, blows


def small_pieces(hz):
    """Response of small pieces, which radiate little bass."""
    return high_pass(hz, 60.6) * (amp(-8.0) + high_pass(hz, 274) ** 2) / 1.215


def scene():
    """Everything on the table, the room and the background."""
    bricks, blows = heap()
    singles = snaps() + clinks() + tile() + touches()
    pile, single = filtered(np.array([bricks, singles]), small_pieces)
    far = room(amp(-8.0) * pile + amp(-12.5) * single)
    mix = pile + single + far + shudder(blows) + thumps() + whistle() + background()
    return mix[None]


def record(dry):
    """Peaks round off at full scale; nothing is kept above the band limit."""
    top_hz = 15950
    soft = dry / (1 + np.abs(dry) ** 6) ** (1 / 6)
    return filtered(soft, lambda hz: np.clip((top_hz - hz) / 250, 0, 1) ** 2)


dry = scene()
out = record(dry)
store_pcm(out)
```